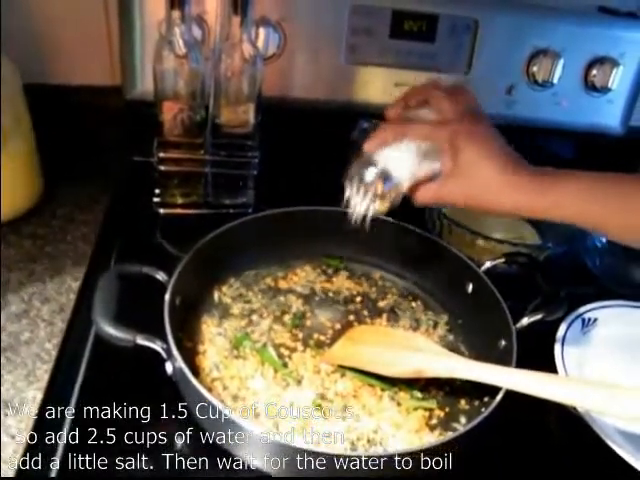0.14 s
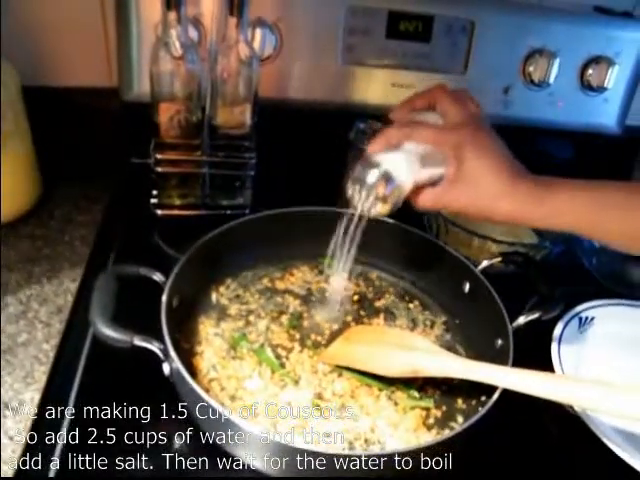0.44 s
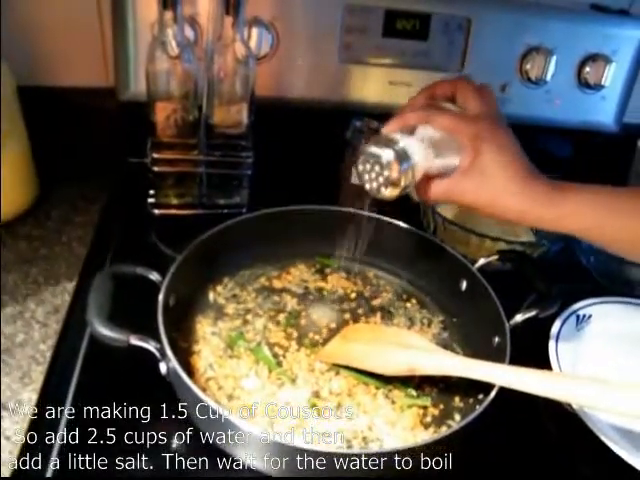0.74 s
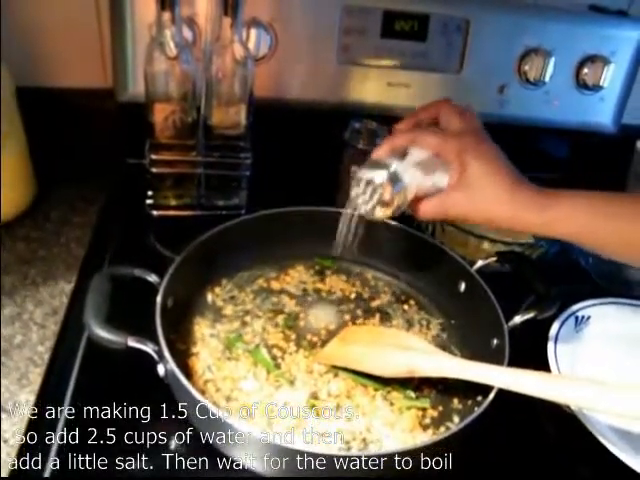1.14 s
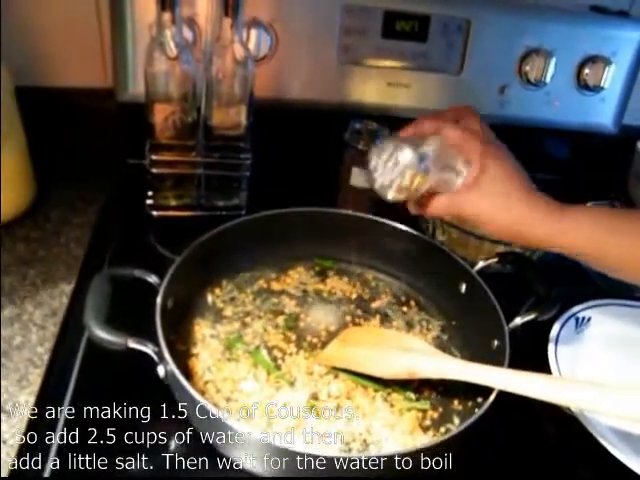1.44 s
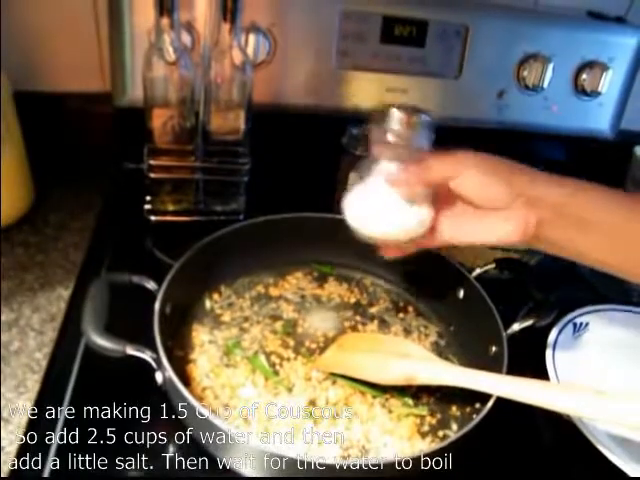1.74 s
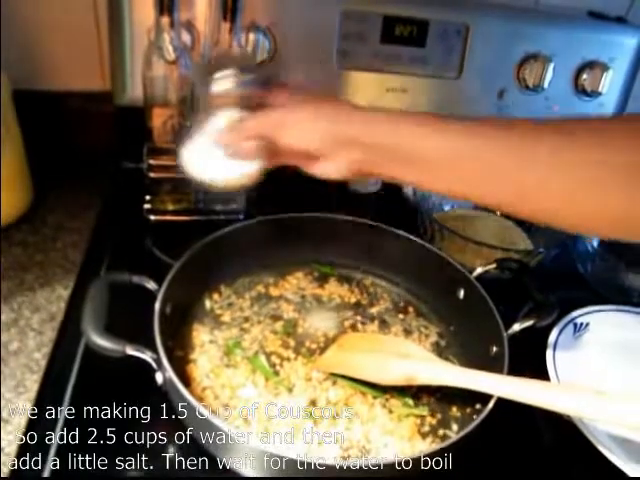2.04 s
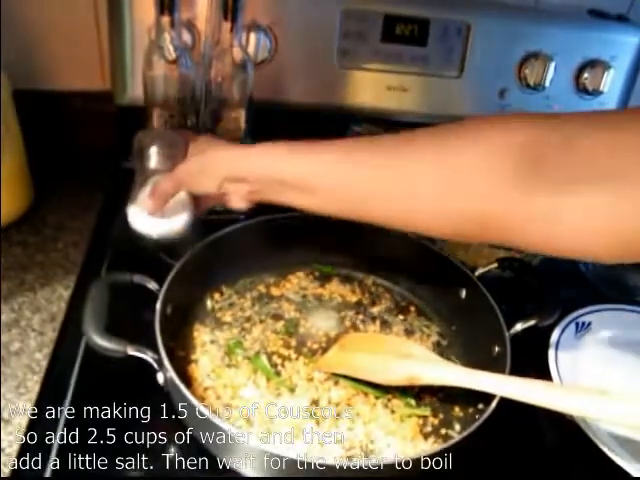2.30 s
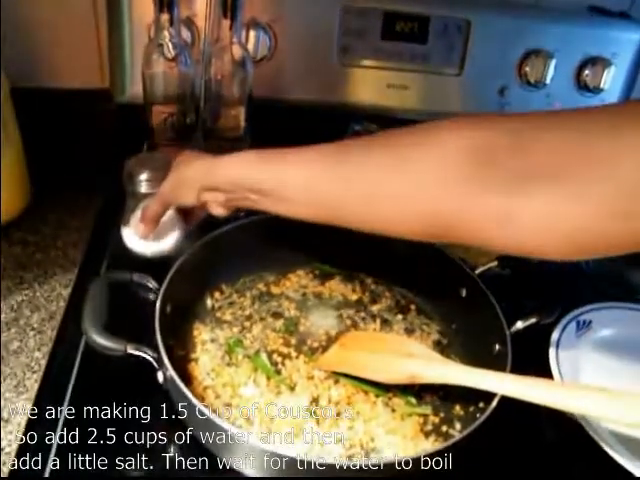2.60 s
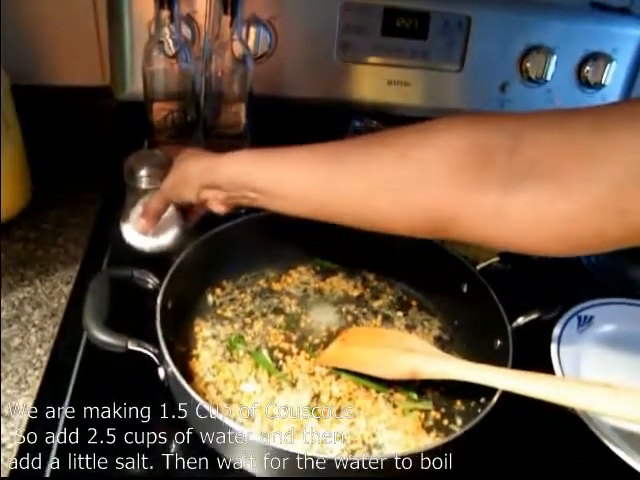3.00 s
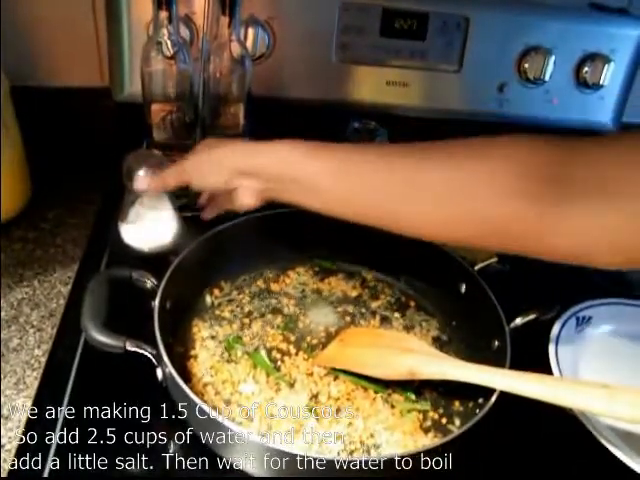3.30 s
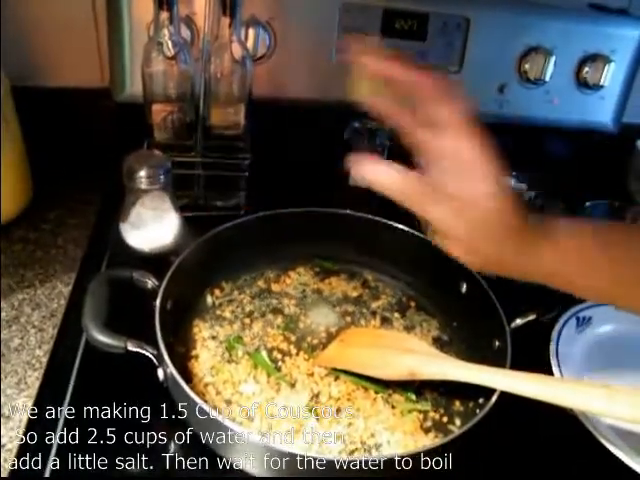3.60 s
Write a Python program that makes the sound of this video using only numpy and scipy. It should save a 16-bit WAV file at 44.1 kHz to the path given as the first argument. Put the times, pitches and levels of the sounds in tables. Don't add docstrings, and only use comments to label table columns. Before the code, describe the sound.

A glass salt shaker is flicked over a pan: faint, bright grain rattles and ticks at 0.15-0.4 s, the sharpest near 0.83, then weaker ones until 1.75. A crisp lens click chatters beside the small, peaky microphone at 2.0, followed by faint rapid buzzing. Light touches lead to two loud, ringing stovetop clacks at 2.83 and 2.99, the second heavier. Tiny squeaks and a last tick follow over steady fan air and low hum.

```python
import sys
import numpy as np
from scipy import signal
from scipy.fft import rfft, irfft
from scipy.io import wavfile

SR = 44100
rng = np.random.default_rng(int(sys.argv[2]) if len(sys.argv) > 2 else 0)


def master_out(mix):
    frames = np.transpose(np.atleast_2d(mix))
    ceiling = np.clip(frames, -1, 1)
    pcm = np.round(ceiling * 32767).astype(np.int16)
    wavfile.write(sys.argv[1], SR, pcm)


def volts(x):
    e = np.asarray(x, float) / 20
    return 10 ** e


N = 165375

# (centre [s], half length [s], level [dB])
SALT_SLIDES = [(0.149, 0.012, -38.5), (0.192, 0.01, -38.5), (0.367, 0.015, -39), (0.39, 0.012, -42.5),
               (0.419, 0.0094, -39.5), (0.681, .012, -48.5), (0.817, .008, -45), (.835, .012, -37),
               (0.877, 0.011, -36), (0.937, 0.06, -52.5), (1.1, 0.01, -50), (1.152, 0.014, -46),
               (1.293, .016, -47.5), (1.342, 0.0099, -45.5), (1.565, 0.0062, -47.5), (1.672, .02, -50),
               (1.713, 0.012, -42.5), (1.736, 0.0081, -40), (2.568, 0.071, -54.5), (3.17, .01, -54)]
# (frequency [Hz], width [Hz], level [dB])
JAR_RESONANCES = [(4500, 520, -6), (6670, 300, -2), (7370, 1500, -8), (8400, 760, -8.5), (9700, 350, -11),
                  (10900, 990, -14)]
# (time [s], peak [dB], pitch [Hz])
CLUMP_KNOCKS = [(.1895, -36, 6870), (.3868, -26.5, 7750), (.806, -37, 6400), (.808, -37, 6400),
                (.8283, -18.5, 7770), (.833, -28, 7800), (.911, -43, 7000), (1.0231, -41, 9000),
                (1.1932, -41, 6950), (1.358, -35.5, 6600), (1.3967, -46, 6440), (1.5544, -49, 8030),
                (1.734, -36, 8000), (3.2975, -44, 6500), (3.3224, -40.5, 6510)]
# (frequency [Hz], level [dB], t60 [s])
CAP_MODES = [(6360, -13, 0.0088), (8700, -11, .008), (9700, -17.5, .01), (12100, -18, .004)]
# (frequency [Hz], level [dB], t60 [s])
EDGE_TOP_MODES = [(159, -25, 0.41), (227, -22.5, 0.23), (328, -22, 0.13), (486, -18.5, 0.31),
                  (547, -15.5, 0.34), (623, -11.5, 0.13), (853, -15.5, 0.1), (1093, -19.5, 0.064),
                  (1310, -16.5, 0.09), (1724, -19, 0.099), (2030, -24, 0.029), (2780, -14.5, 0.049)]
# (frequency [Hz], level [dB], t60 [s])
FLAT_TOP_MODES = [(155.8, -18, 0.33), (238, -23.5, .2), (421, -27, 0.26), (517.5, -16, 0.15),
                  (645, -12, 0.058), (855, -14.5, 0.075), (1359, -8, 0.046), (1720, -34, 0.032),
                  (2120, -19.5, 0.053), (2296, -23, .04), (2960, -5.5, 0.021), (3440, -10, 0.031),
                  (5917, -14.5, 0.028), (6374, -22, 0.049)]
# (frequency [Hz], density [dB per Hz])
EDGE_CRACK_COLOUR = [(150, -34), (300, -24), (800, -2.5), (1200, -6.5), (3390, -20), (4730, -29),
                     (6090, -28.5), (15000, -63)]
# (frequency [Hz], density [dB per Hz])
FLAT_CRACK_COLOUR = [(150, -19), (400, -12.5), (800, -3.5), (1350, -4), (2800, -5), (4840, -14.5),
                     (6480, -12), (8520, -28), (15000, -53)]
# (frequency [Hz], density [dB per Hz])
SHUDDER_COLOUR = [(150, -0.5), (500, 4.5), (3500, -14.5), (6500, -30), (9000, -47)]
# (time [s], peak [dB], brightness [dB])
LIGHT_TOUCHES = [(0.3562, -42, 0), (1.1287, -38.5, -8.5), (1.298, -45.5, 0), (2.1984, -42, -6),
                 (2.2671, -42, -6), (2.316, -29, -6.5), (2.3659, -44, -11), (2.4, -30, -12.5),
                 (2.4347, -46, -4), (2.7173, -33.5, -8.5), (2.7378, -35.5, -11), (2.771, -33.5, -18),
                 (2.8017, -34, -18), (3.5055, -30.5, -7)]
# (frequency [Hz], level [dB], t60 [s])
RACK_MODES = [(1064, -11, 0.034), (1550, -16.5, .025), (2814, -6, 0.026), (4000, -16, .015)]
# (time [s], pitch [Hz], level [dB])
PAN_SQUEAKS = [(.195, 1550, -49.5), (.76, 1650, -51.5), (.87, 1500, -53.5), (1.285, 1650, -58),
               (1.712, 4500, -44), (1.739, 4500, -41.5), (1.855, 4000, -57), (2.654, 4100, -52),
               (2.902, 4100, -57), (3.324, 4100, -48), (3.424, 4050, -53), (3.522, 4080, -52)]
# (time [s], peak [dB])
LATCH_CONTACTS = [
    (2.0017, -23),
    (2.0035, -17),
    (2.0052, -13),
    (2.0075, -25),
    (2.0109, -14.5),
    (2.0145, -24),
]
# (frequency [Hz], level [dB], t60 [s])
LATCH_RINGS = [(1650, -27, 0.035), (2036, -23.5, 0.055), (4200, -24, 0.018), (5500, -3, 0.0092),
               (5990, -8.5, 0.015), (6400, -12, .014), (11840, -27, .012), (13600, -23, .012)]
# (frequency [Hz], density [dB per Hz])
AIR_COLOUR = [(25, 1), (100, -4), (250, 0), (600, -7), (1100, -13.5), (3500, -17.5), (7500, -22),
              (16000, -34)]
# (frequency [Hz], width [Hz], rms [dB])
HUM_BANDS = [(82.6, 11, -62), (212, 8.3, -55), (240.6, 22, -63), (580.2, 9.6, -64), (895.7, 20, -66),
             (1650, 13, -69), (6430, 520, -64), (9590, 86, -74), (14560, 150, -75)]
# (frequency [Hz], rms [dB], waver [dB])
MOTOR_TONES = [(41, -59.5, -0.7), (120, -52.5, 1.5), (2560, -68.5, 3.5), (3036, -66.5, 0.5)]


def rms_one(x):
    return x / np.sqrt(np.mean(x ** 2) + 1e-20)


def coloured(points):
    hz, db = np.transpose(points)
    bin_hz = np.arange(N // 2 + 1) * SR / N
    gain = volts(np.interp(np.log(bin_hz + 1), np.log(hz), db))
    return rms_one(irfft(rfft(rng.standard_normal(N)) * gain, N))


def resonance(x, hz, width_hz):
    r = np.exp(-np.pi * width_hz / SR)
    poles = [1, -2 * r * np.cos(2 * np.pi * hz / SR), r * r]
    return signal.lfilter([(1 - r * r) / 2, 0, (r * r - 1) / 2], poles, x)


def noise_band(hz, width_hz, wide_hz):
    noise = rng.standard_normal(N + SR)
    return rms_one(resonance(resonance(noise, hz, width_hz), hz, wide_hz)[SR:])


def sine(hz):
    return np.sin(2 * np.pi * hz * np.arange(N) / SR)


def decay(s, db, t60_s, rise_s=0.00018):
    clicks = np.full(N, 1e-18)
    clicks[(np.asarray(s) * SR).astype(int)] += volts(db)
    r = np.exp(-1 / (rise_s * SR))
    poles = np.convolve([1, -r], [1, -volts(-60 / (t60_s * SR))])
    return signal.lfilter([1 - r], poles, clicks)


def hump(s, half_s):
    return np.exp(-.5 * ((np.arange(N) / SR - s) / half_s) ** 2)


def strike(s, db, modes, vary_db, rise_s):
    out = np.zeros(N)
    chance = rng.standard_normal((np.size(s), len(modes)))
    at = (np.asarray(s) * SR).astype(int)
    for k, (hz, mode_db, t60_s) in enumerate(modes):
        blows = np.full(N, 1e-18)
        blows[at] = volts(np.asarray(db) + mode_db + vary_db * chance[:, k]) * (-1) ** k
        w = 2 * np.pi * hz / SR
        for sign, r in [(1, volts(-60 / (t60_s * SR))), (-1, np.exp(-1 / (rise_s * SR)))]:
            out += sign * signal.lfilter([0, r * np.sin(w)], [1, -2 * r * np.cos(w), r * r], blows)
    return out


def grains():
    grains_per_s, spread_db = 3000, 4.5
    hits = rng.random(N) < grains_per_s / SR
    sizes = volts(spread_db * np.minimum(rng.exponential(1, N), 4.0))
    clicks = hits * sizes * rng.choice([-1, 1], N)
    return rms_one(clicks) * sum(volts(db) * hump(s, half_s) for s, half_s, db in SALT_SLIDES)


def salt():
    rings_db, hiss_db, hiss_hz, land_s = -9.5, -10.5, 5000, .006
    rings = []
    for hz, width_hz, db in JAR_RESONANCES:
        ring = resonance(resonance(grains(), hz, width_hz), hz, 9.0 * width_hz)
        rings.append(volts(db) * np.sqrt(SR / width_hz) * ring)
    rings[0] = np.roll(rings[0], int(land_s * SR))
    high_pass = signal.butter(2, hiss_hz, "high", fs=SR, output="sos")
    hiss = signal.sosfilt(high_pass, sum(grains() for layer in range(3)) / 2)
    return volts(rings_db) * sum(rings) + volts(hiss_db) * hiss


def clump_knocks():
    knocks = sum(strike([s], [db], [(hz, 0, .014)], vary_db=0.5, rise_s=0.00033) for s, db, hz in CLUMP_KNOCKS)
    s, db, _ = np.transpose(CLUMP_KNOCKS)
    return knocks + strike(s, db, CAP_MODES, vary_db=2.5, rise_s=.0004)


def set_down(s, peak_db, crack_db, modes, crack_colour):
    rebound_s, rebound_db = 0.002743, -5
    crack_t60_s, shudder_t60_s, shudder_db = 0.081, 0.5, -10
    blows_s, blows_db = [s, s + rebound_s], [peak_db, peak_db + rebound_db]
    rings = strike(blows_s, blows_db, modes, vary_db=3.55, rise_s=0.00043)
    crack = decay([s], crack_db, crack_t60_s) * coloured(crack_colour)
    shudder_noise = (coloured(SHUDDER_COLOUR) + coloured(crack_colour)) / 2
    shudder = decay([s], crack_db + shudder_db, shudder_t60_s, rise_s=0.0035) * shudder_noise
    return rings + crack + shudder


def touches():
    s, db, bright_db = np.transpose(LIGHT_TOUCHES)
    tick_noise = coloured([(600, -19), (1200, 3), (7000, 1.5), (15000, -31)])
    tick = decay(s, db + bright_db, 0.039) * tick_noise
    return tick + strike(s, db, RACK_MODES, vary_db=2.5, rise_s=0.00081)


def squeaks():
    return sum(volts(db) * hump(s, 0.0049) * sine(hz) for s, hz, db in PAN_SQUEAKS)


def lens_latch():
    s, db = np.transpose(LATCH_CONTACTS)
    latch = strike(s, db, LATCH_RINGS, vary_db=3.0, rise_s=0.00028)
    rattle_noise = coloured([(700, -18), (2000, -17), (4800, -9.5), (6000, 4), (8000, -7.5), (15000, -26)])
    return latch + decay(s[:1], -27, 0.091) * rattle_noise


def lens_steps():
    first_s, every_s, jitter_s = 2.1945, .03337, .0012
    step_db, vary_db, step_t60_s = -46, 0.81, .04
    buzz_hz, width_hz = 5900, 800
    tail_db, tail_t60_s = -41.5, 0.39
    step = np.r_[0:24, 40:47]
    chance = rng.standard_normal((len(step), 2))
    step_s = first_s + every_s * step + jitter_s * chance[:, 0]
    pulses = decay(step_s, step_db + vary_db * chance[:, 1], step_t60_s, rise_s=0.003)
    tail = decay([LATCH_CONTACTS[0][0]], tail_db, tail_t60_s)
    buzz = rms_one(resonance(resonance(rng.standard_normal(N), buzz_hz, width_hz), buzz_hz, 2 * width_hz))
    return (pulses + tail) * buzz


def room(x):
    t60_s, level_db, cut_hz, rise_s = 0.48, -14, 2330, 0.024
    t = np.arange(SR) / SR
    tail = rng.standard_normal(SR) * volts(-60 * t / t60_s) * np.clip(t / rise_s, 0, 1)
    tail = signal.sosfilt(signal.butter(1, cut_hz, fs=SR, output="sos"), tail)
    return volts(level_db) * signal.fftconvolve(x, tail / np.sqrt(np.sum(tail ** 2)))[:N]


def fan_air():
    air_db, patchy_db = -49, 1.3
    waver = rms_one(resonance(rng.standard_normal(N), 3.1, 13.4))
    return volts(air_db + patchy_db * waver) * coloured(AIR_COLOUR)


def motor_hums():
    hums = sum(volts(db) * noise_band(hz, width_hz, 2 * width_hz) for hz, width_hz, db in HUM_BANDS)
    tones = np.zeros(N)
    for hz, db, waver_db in MOTOR_TONES:
        waver = noise_band(3.0, 7.4, 7.4)
        tones += volts(db + 2 + waver_db * waver) * sine(hz)
    return hums + tones


def scene():
    small = salt() + clump_knocks() + touches() + squeaks()
    edge = set_down(2.8313, -8.5, -18, EDGE_TOP_MODES, EDGE_CRACK_COLOUR)
    flat = set_down(2.9933, -2.3, -11, FLAT_TOP_MODES, FLAT_CRACK_COLOUR)
    far = small + room(small) + edge + flat
    far = signal.sosfilt(signal.butter(4, 121, "high", fs=SR, output="sos"), far)
    near = lens_latch() + lens_steps()
    return (far + near + fan_air() + motor_hums())[None]


def low_pass(x):
    return signal.sosfilt(signal.butter(12, 16610, fs=SR, output="sos"), x)


def record(dry):
    notch_hz, notch_width_hz, notch_share = 4850, 600, .9
    peak_hz, peak_width_hz, peak_db = 5750, 1720, -1
    clip_top, top_cut_hz = .92, 15950
    x = dry - notch_share * resonance(dry, notch_hz, notch_width_hz)
    x = x + volts(peak_db) * resonance(x, peak_hz, peak_width_hz)
    x = x / (1 + (x / clip_top) ** 20) ** (1 / 20)
    x = signal.sosfilt(signal.cheby2(10, 30, top_cut_hz, fs=SR, output="sos"), x)
    return low_pass(x)


dry = scene()
out = record(dry)
master_out(out)
```